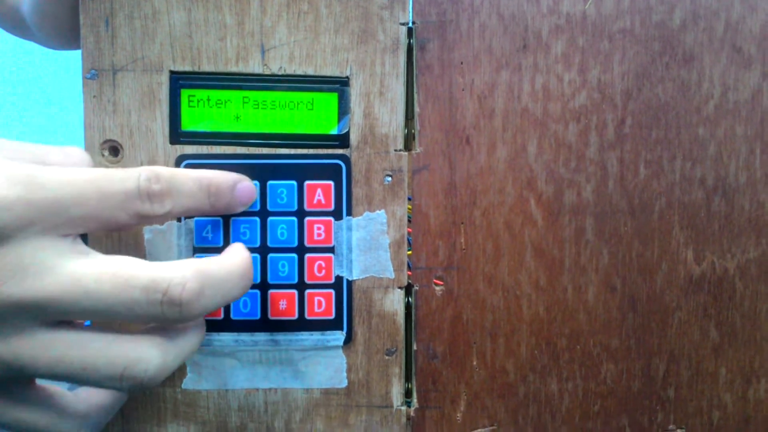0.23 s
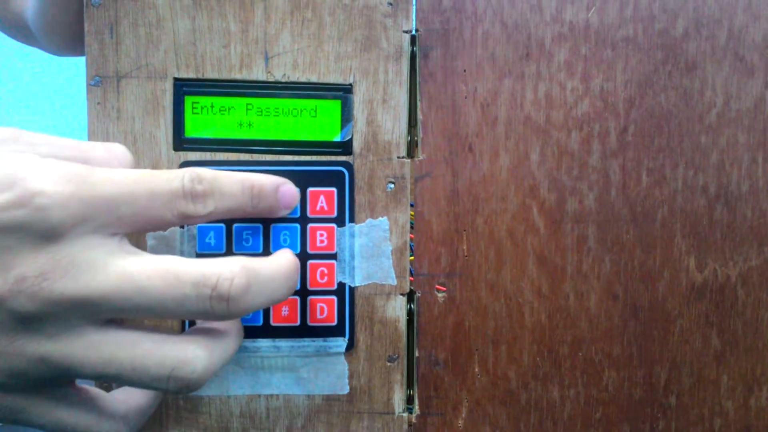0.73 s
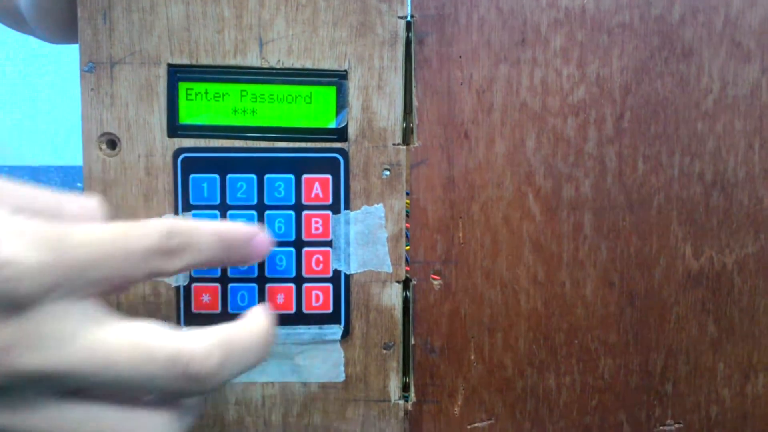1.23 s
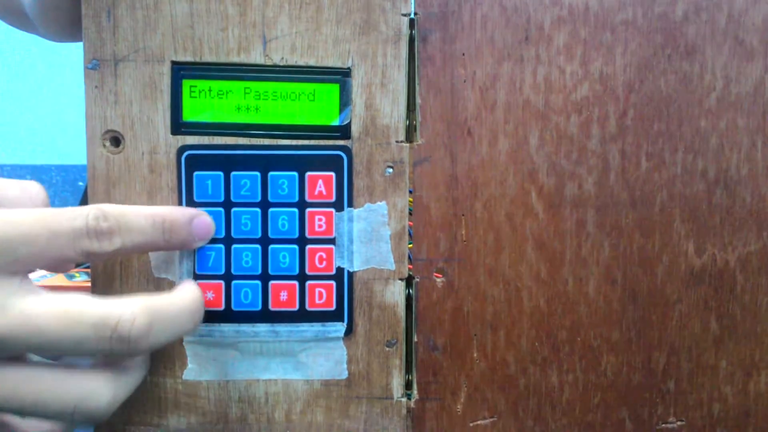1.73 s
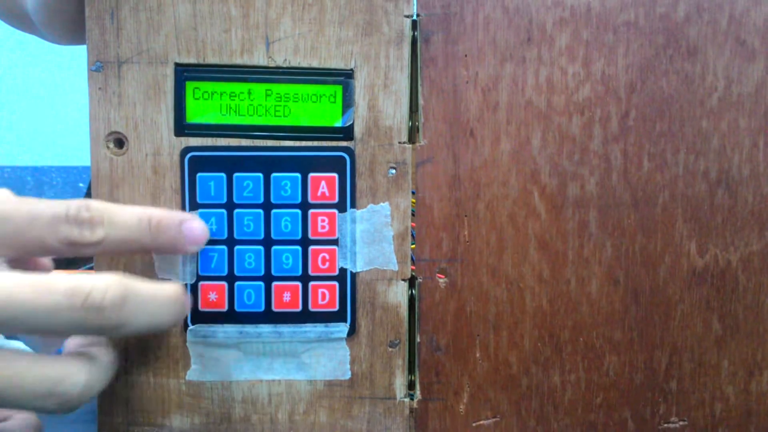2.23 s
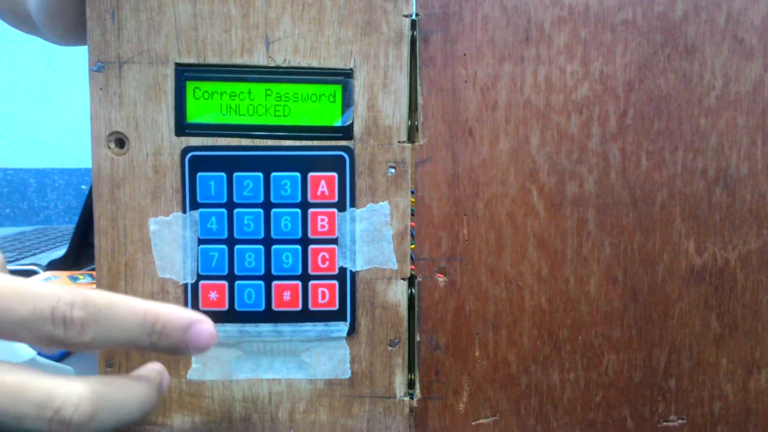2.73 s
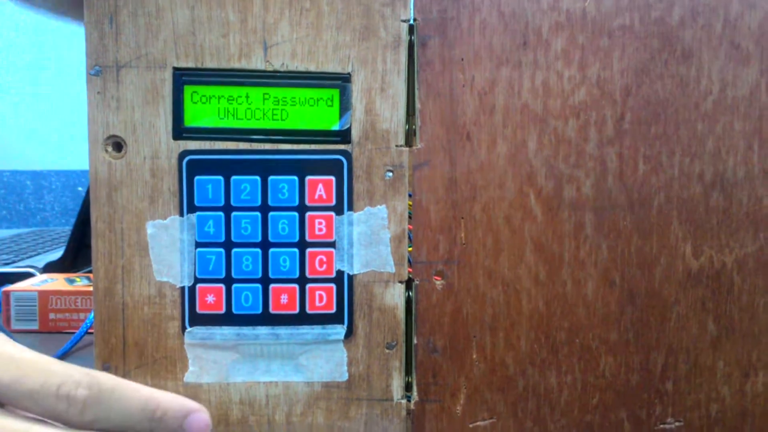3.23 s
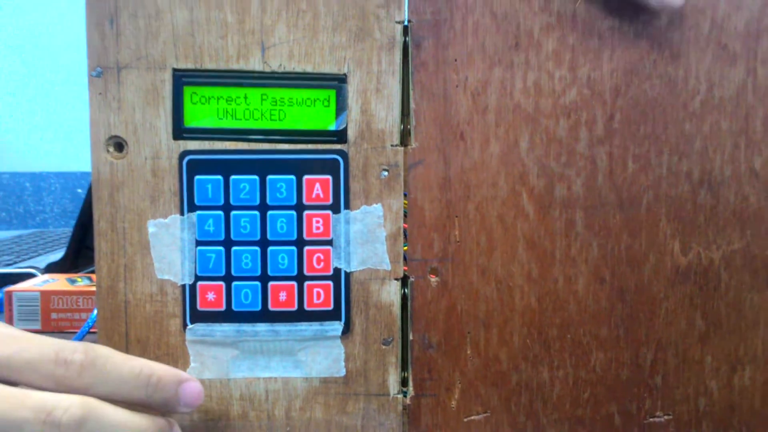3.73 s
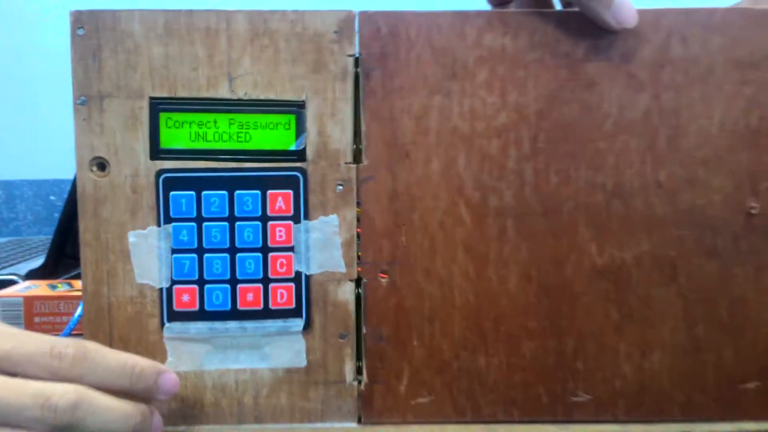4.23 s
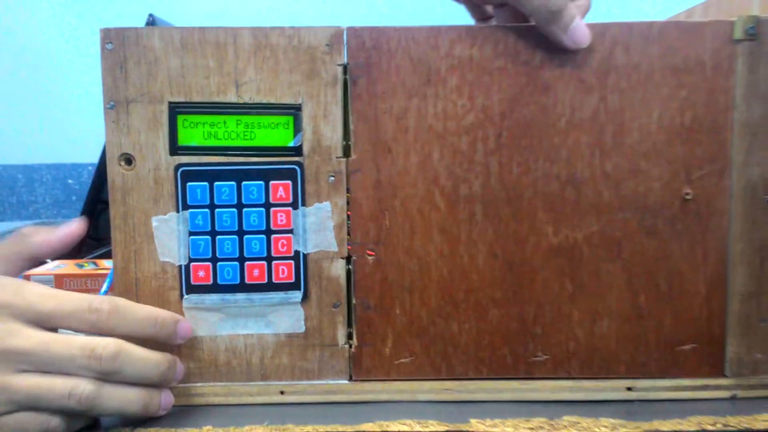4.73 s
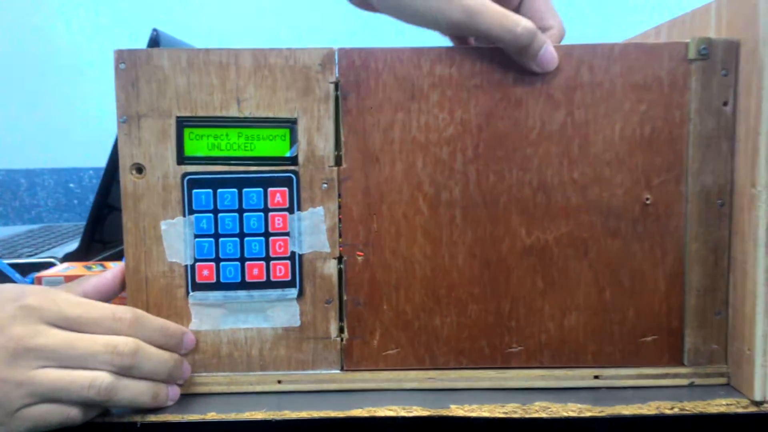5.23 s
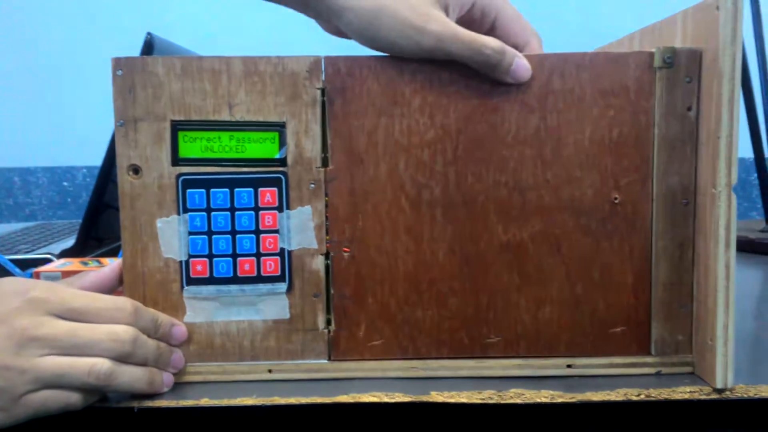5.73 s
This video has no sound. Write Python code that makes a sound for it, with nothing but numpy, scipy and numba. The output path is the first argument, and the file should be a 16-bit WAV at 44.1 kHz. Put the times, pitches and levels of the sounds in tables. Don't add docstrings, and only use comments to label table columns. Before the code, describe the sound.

Fingers press a plastic keypad with tiny dry clicks and dull panel knocks, hands hissing faintly across wood. Low bumps from handling come and go beneath steady room air and a faint machine hum. Near the end a short metal drag leads to a violent clipped clack with rapid bounces and boxy thud, ringing through a small reflective room, heard close on a phone.

```python
import sys
import numpy as np
from scipy import signal
from scipy.fft import rfft, irfft
from scipy.io import wavfile
from scipy.ndimage import uniform_filter1d
from numba import njit

SR = 44100
rng = np.random.default_rng(int(sys.argv[2]) if len(sys.argv) > 2 else 0)


def elevation(decibels):
    levels = np.asarray(decibels, float)
    return 10 ** (levels / 20)


def to_wav(sig):
    pcm = np.clip(np.atleast_2d(sig), -1, 1) * 32767
    pcm = np.round(pcm).astype(np.int16)
    wavfile.write(sys.argv[1], SR, pcm.T)


N = 264600
TIME = np.arange(N) / SR

# pitch in Hz, level in dB per Hz.
AIR_COLOUR = [(15, -38), (25, -8), (114, -22), (229, -10), (309, -21.5), (344, -13), (489, -18.5),
              (1130, -20), (1230, -20.5), (2050, -23), (3620, -23), (4870, -28.5), (6740, -30), (8360, -43),
              (16000, -38)]
AIR_DB = -50.5
# pitch in Hz, level in dB.
MACHINE_HUMS = [(59.2, -59), (344.5, -70), (532.9, -70.5), (1200, -67.5)]

# middle in seconds, length in seconds, level in dB.
THRUMS = [(0.216, 0.56, -48), (1.4, 0.27, -59), (1.78, .18, -52), (1.992, 0.11, -48.5), (2.358, 0.095, -54),
          (2.565, 0.24, -51), (2.886, 0.082, -48.5), (3.52, 0.087, -53.5), (4.28, 0.27, -59.5),
          (5.03, 0.11, -50.5), (5.327, .1, -57)]
# middle in seconds, length in seconds, level in dB.
TABLE_JOLTS = [(.18, 0.51, -55.5), (.56, 0.27, -62), (2.33, 0.13, -52), (2.62, .12, -53), (4.28, 0.19, -46),
               (4.56, 0.17, -45), (4.8, 0.34, -57.5), (5.14, .14, -54), (5.42, 0.23, -49)]
# middle in seconds, length in seconds, level in dB.
BOX_JOLTS = [(.1, 0.14, -60.5), (.5, 0.18, -55.5), (1.38, .26, -60), (1.78, 0.41, -65),
             (2.53, 0.082, -55.5), (3.9, 0.32, -56.5), (4.05, 0.063, -51.5), (4.3, 0.48, -58),
             (4.82, 0.21, -59), (5.13, 0.31, -55)]
RESTING_DB = (-60.5, -59, -56)

# pitch in Hz, level in dB per Hz.
ECHO_COLOUR = [(100, -26.5), (250, -22.5), (700, -29.5), (1850, -27), (2200, -20), (3000, -12),
               (3750, -4.5), (4600, -9), (5300, -11), (6900, -5), (7500, -10.5), (8000, -23),
               (10000, -25.5), (11500, -32.5), (16000, -38)]
# pitch in Hz, time to fade by 60 dB in seconds.
ECHO_T60 = [(100, 0.51), (500, 0.6), (1400, 0.51), (3000, 0.59), (6000, 0.57), (9000, 0.43), (11500, 0.35),
            (15000, 0.34)]
# pitch in Hz, width in Hz, level in dB.
LATCH_PLATE = [(720, 89, 8), (1096, 94, 9), (2460, 150, 4), (3790, 300, 1.5), (4470, 120, 7),
               (5110, 120, 6), (3290, 110, -3), (7390, 70, 3), (6900, 490, -3), (9550, 300, 4.5),
               (10250, 300, 6), (12650, 400, 6), (14900, 300, 3)]

# time in seconds, pressure in dB.
PALM_PRESSURE = [(0., 4.5), (.2, -0.5), (.62, 3), (.9, -2), (1.3, -0.5), (2.05, -3), (2.66, 0.5), (3.1, -2),
                 (3.5, 1.5), (4., 0), (4.56, 0), (5.3, 3.5), (5.4, 3.5)]
COARSE_DB, FINE_DB = -57, -68
FINE_SLOPE = 0.62
GRAIN_DB = 1.6
# start in seconds, rise in seconds, level in dB, fade by 60 dB in seconds.
SLEEVE_SWIPES = [
    (3.34, .08, -58, 2.2),
    (3.505, .008, -54, .6),
]
# start in seconds, length in seconds, level in dB, pitch in Hz.
SLIPS = [(.028, 0.046, -44, 3810), (.048, .04, -51, 7300), (.036, 0.035, -53, 6400),
         (.46, 0.027, -52, 4200), (.618, .045, -55, 7600), (.64, .014, -52.5, 3600),
         (1.178, 0.029, -53, 7400), (1.18, .022, -50, 4700), (1.447, .015, -61, 7700),
         (1.54, .035, -65, 7600), (1.535, .035, -58, 4570), (1.652, 0.035, -57.5, 7500),
         (1.652, .035, -52.5, 4020), (1.655, .035, -59, 5600), (1.178, 0.026, -61, 2300),
         (2.045, 0.038, -51.5, 3720), (3.338, .08, -49, 3780), (3.415, .032, -47, 7000),
         (3.365, .05, -57, 7300), (3.42, 0.014, -59, 9350), (3.36, .16, -57, 4000), (.05, .06, -56, 3800),
         (.6, .09, -59.5, 2300), (.462, .03, -58, 2200), (5.957, 0.014, -60, 11700),
         (5.981, .019, -44, 7100), (5.979, 0.022, -45, 11800), (5.982, 0.016, -44, 3880)]
# start in seconds, length in seconds, level in dB, pitch in Hz.
SLIDES = [(.6, .3, -65, 920), (2.1, .33, -72, 7160), (2.95, 0.17, -64, 2440), (3.33, .062, -53.5, 418),
          (3.72, .3, -63, 7000), (4.7, 0.64, -57.5, 3020), (4.85, 0.41, -65, 950)]
# start in seconds, length in seconds, level in dB, pitch in Hz.
SQUEAKS = [(.628, .022, -54, 8000), (1.98, .035, -54, 3550), (2.17, .25, -68, 7300), (2.17, .2, -68, 5300),
           (5.98, .02, -40, 7100), (4.66, .2, -62, 2550), (4.88, .3, -64, 930)]
SLIP_WIDTH, SLIDE_WIDTH, SQUEAK_WIDTH = .24, 0.16, .04
# time in seconds, peak in dB, pitch in Hz, ring of the microphone port in dB.
TICKS = [(.0453, -40.5, 4270, 10.5), (.4612, -33, 4770, -4), (.4652, -40, 3470, -5), (.4680, -43, 2980, -6),
         (.5942, -44, 8800, 4), (.5945, -48, 5200, -11), (.6198, -41, 3600, -11), (.6242, -33, 3600, -16),
         (.6570, -44, 4630, -6), (1.1790, -29.5, 6900, -5.5), (1.1792, -36, 4730, -10),
         (1.2776, -45, 7500, -4), (1.6548, -42, 8000, 0), (2.0515, -45.5, 7500, 6.5),
         (2.1662, -38, 6700, -21), (2.2146, -48, 7000, -8), (2.3300, -45, 9300, -13),
         (3.3418, -46, 3600, -2), (3.4062, -33, 7140, -12), (3.4228, -39, 9700, -10),
         (3.4300, -21.5, 6850, -30), (4.1090, -41, 9000, -24), (4.3228, -48, 9000, -6),
         (4.3600, -52, 9000, -12), (5.0220, -44, 6800, -10), (5.2870, -38.5, 6540, -1),
         (5.9797, -22, 7060, -13), (5.9850, -21, 6860, -10), (5.9930, -19, 6700, -8)]
SNAP_T60_S, SNAP_FALL = 0.0053, 2
# time in seconds, level in dB, brightness in dB per octave.
KNOCKS = [(.461, -37, 2.5), (0.595, -42, -1), (.655, -41, -1), (1.179, -42, -3.5), (2.052, -46, -6),
          (2.64, -46.5, -12), (3.343, -47.5, -6), (5.399, -44.5, 6), (5.990, -38, -13)]
# pitch in Hz, level in dB, fade by 60 dB in seconds.
PANEL = [(231, -2, 0.027), (354, 4.5, 0.2), (408, 1.5, 0.054), (783, 7.5, 0.09), (911, -0.5, 0.22),
         (1087, 1, .06), (1490, -0.5, 0.068), (1950, -3, 0.066)]

# time in seconds, level in dB.
DRAG = [(5.399, -58.5), (5.410, -46), (5.440, -43.5), (5.450, -48.5), (5.458, -38.5), (5.490, -40),
        (5.512, -37), (5.516, -34)]
# pitch in Hz, width in Hz, level in dB.
BOLT_SLEEVE = [(1000, 200, -9.5), (2300, 680, -6), (3600, 370, -0.5), (4250, 200, -9), (5760, 200, -7.5),
               (6300, 290, -10), (7160, 190, -0.5)]
# pitch in Hz, level in dB, fade by 60 dB in seconds.
NOSE = [(2120, -4, 0.016), (2690, -8, 0.015), (3760, -2, 0.082), (4300, -5, 0.053), (5430, -4, 0.016),
        (7100, -10.5, 0.02), (9690, -18, 0.011)]
TOUCH_S, CAUGHT_S, SLAM_S = 5.5187, 5.5303, 5.5313
TOUCH_DB = 1.5
# delay in seconds, level in dB, fade by 60 dB in seconds.
BLOWS = [(0., 8, 0.026), (.0035, 12.5, 0.027), (.0070, 7, 0.01), (0.0104, 3, 0.016), (0.0154, 7, .009),
         (.0186, 3.5, .009)]
# pitch in Hz, level in dB, fade by 60 dB in seconds.
BOLT_RING = [(2380, -6, 0.44), (3440, -18, 5.0), (3560, -11, 0.19), (4070, -36, 5.0), (3730, -11, 0.57),
             (4566, 2, 0.14), (4740, -5, 2.1), (5176, -6.5, 0.32), (5900, -2.5, 0.22), (5660, -2.5, 0.24),
             (6300, -8.5, 0.16), (6400, -10.5, 0.2), (6750, 13, 0.33), (7060, -7, 0.31), (7359, -13, 0.14),
             (8060, -38, 0.22), (9300, -23.5, 0.22), (10400, -25, 0.19), (12800, -38.5, 0.41),
             (15800, -25.5, 0.16)]
# pitch in Hz, level in dB, fade by 60 dB in seconds.
BOX_THUD = [(185, -12.5, 0.055), (195, 9, 0.04), (270, 4, .03), (513, -8.5, 0.035),
            (699, 15.0, 0.033), (937, 11.5, .05), (1446, 17, 0.01), (1800, 18, .012)]

TOP_HZ, CLIP = 15750, .82


def level(x, db):
    return x * elevation(db) / np.sqrt(np.mean(x ** 2))


def band(x, hz, width_hz):
    return signal.lfilter(*signal.iirpeak(hz, max(hz / width_hz, .3), fs=SR), x)


def along(table, hz):
    f, value = np.transpose(table)
    return np.interp(np.log(hz), np.log(f), value)


def slices(table, size):
    f = np.fft.rfftfreq(size, 1 / SR) + 1e-3
    shaped = rfft(rng.standard_normal(size)) * elevation(along(table, f))
    parts = []
    for centre in 25 * 2 ** np.arange(0, 10, .5):
        share = np.clip(1 - 2 * abs(np.log2(f / centre)), 0, 1)
        parts.append((centre, irfft(shaped * share, size)))
    return parts


def walk(rate):
    k = int(SR / rate)
    held = np.repeat(rng.standard_normal(N // k + 1), k)
    return uniform_filter1d(uniform_filter1d(held, k), k)[:N]


def ring(modes, tilt_db=0., longest=1.):
    t = TIME[:SR // 2]
    out = 0
    for hz, db, t60 in modes:
        fade = elevation(-60 * t / min(t60, longest))
        out = out + elevation(db + tilt_db * np.log2(hz / 600)) * np.sin(2 * np.pi * hz * t) * fade
    return out


def add(out, s, sound):
    i = int(s * SR)
    out[i:i + len(sound)] += sound[:N - i]


def grit(spread_db):
    return level(rng.standard_normal(N) * elevation(spread_db * rng.exponential(size=N)), 0)


def port(x):
    return signal.sosfilt(signal.butter(8, 7900, fs=SR, output="sos"), x) + elevation(-24) * x


def air():
    bed = 0
    for hz, part in slices(AIR_COLOUR, N):
        if hz > 250:
            bed = bed + elevation(2.3 * min(1, 3000 / hz) * walk(5.92)) * part
    hums = 0
    for hz, db in MACHINE_HUMS[1:]:
        waver = elevation(db + 1.5 + 3 * walk(6.02))
        hums = hums + waver * np.sin(2 * np.pi * hz * TIME + 1.2 * walk(5))
    running = np.clip((4.8 - TIME) / 1.3, .3, 1)
    return level(bed, AIR_DB - 5.5) + running * hums


def rumble():
    shake = rng.standard_normal((3, N))
    deep = band(band(shake[0], 57.7, 11.6), 59, 30) + elevation(-5.5) * band(shake[0], 32, 18)
    table = band(band(shake[1], 114.7, 36), 112.7, 62)
    box = elevation(-9.0) * band(shake[2], 173.5, 37.5) + band(shake[2], 209.0, 37)
    out = 0
    for body, rest_db, jolts in zip((deep, table, box), RESTING_DB, (THRUMS, TABLE_JOLTS, BOX_JOLTS)):
        swell = sum(elevation(db) * np.exp(-(2.76 * (TIME - s) / length) ** 2) for s, length, db in jolts)
        out = out + level(body, 0) * (elevation(rest_db) + swell)
    return out


def room(x, wet_db):
    t = TIME[:SR]
    tail = sum(part * elevation(-60 * t / along(ECHO_T60, hz)) for hz, part in slices(ECHO_COLOUR, SR))
    lumps = elevation(2.4 * walk(400)[:SR] * np.exp(-t / 0.17))
    tail = tail * lumps * np.clip(t / 0.0033, 0, 1) / np.sqrt(np.sum(tail ** 2))
    return elevation(wet_db) * signal.fftconvolve(x, tail)[:N]


def palms_and_sleeve(cloth):
    pressure_db = np.interp(TIME, *np.transpose(PALM_PRESSURE))
    coarse = band(band(grit(GRAIN_DB), 3650, 1100), 3650, 1100)
    fine = port(band(band(cloth, 6770, 1300), 6720, 1300))
    fine += elevation(-14.5) * band(band(cloth, 9500, 1000), 9500, 1000)
    swipe = 0
    for s, rise, db, t60 in SLEEVE_SWIPES:
        fade = elevation(db - 60 * np.maximum(TIME - s, 0) / t60)
        swipe = swipe + fade * np.clip((TIME - s) / rise, 0, 1)
    fine_gain = elevation(FINE_DB + FINE_SLOPE * pressure_db) + swipe
    return level(coarse, COARSE_DB) * elevation(pressure_db) + level(fine, 0) * fine_gain


def scrapes(cloth):
    out = np.zeros(N)
    for rows, width in ((SLIPS, SLIP_WIDTH), (SLIDES, SLIDE_WIDTH), (SQUEAKS, SQUEAK_WIDTH)):
        for s, length, db, hz in rows:
            size = int(length * SR)
            grains = cloth[int(s * SR / 2):][:size]
            scrape = band(band(grains, hz, width * hz), hz, width * hz)
            swell = np.hanning(size) ** .5 * elevation(-4 * np.linspace(-1, 1, size))
            add(out, s, level(scrape, db) * swell)
    return out


def nail_ticks():
    out = np.zeros(N)
    for s, db, hz, port_db in TICKS:
        t60 = SNAP_T60_S * (7000 / hz) ** SNAP_FALL
        snap = ring([(hz, 0, t60), (1.39 * hz, -13, t60 / 2),
                     (min(2 * hz, 15000), -20, t60 / 3), (3650, port_db, .015)])
        add(out, s, elevation(db) * snap * np.clip(TIME[:len(snap)] / 0.00026, 0, 1))
    return out


def key_knocks():
    out = np.zeros(N)
    for s, db, tilt_db in KNOCKS:
        add(out, s, elevation(db - 13.5) * ring(PANEL, tilt_db))
    return out


def hands():
    cloth = grit(GRAIN_DB)
    return palms_and_sleeve(cloth) + scrapes(cloth) + nail_ticks() + key_knocks()


def bolt_drag(rub):
    s, db = np.transpose(DRAG)
    drag = port(sum(elevation(d - 10 * np.log10(w)) * band(band(rub, hz, 2 * w), hz, w)
                    for hz, w, d in BOLT_SLEEVE))
    loudness = elevation(np.interp(TIME, s, db, left=-120, right=-120))
    return level(drag, 0) * uniform_filter1d(loudness, size=130)


def bolt_touch(rub):
    out = np.zeros(N)
    t = TIME[:int((CAUGHT_S - TOUCH_S) * SR)]
    grip = np.clip(t / 0.0028, 0, 1) * np.clip((t[-1] - t) / 0.0018, 0, 1)
    nose = ring(NOSE)[:len(t)] + elevation(-15) * port(rub[:len(t)])
    add(out, TOUCH_S, elevation(TOUCH_DB - 3) * grip * nose)
    return out


def bolt_slam():
    blows, t = np.zeros(N), TIME[:SR // 10]
    cracks = rng.standard_normal((len(BLOWS), len(t)))
    for (delay, db, t60), crack in zip(BLOWS, cracks):
        add(blows, SLAM_S + delay, elevation(db - 60 * t / t60) * crack)
    out = elevation(14) * band(band(blows, 3290, 2000), 3990, 900)
    out += elevation(15.0) * band(band(blows, 6140, 1200), 6900, 1150)
    hard = np.exp(-np.clip(TIME - SLAM_S, 0, 1) / 0.023)
    out += hard * (elevation(-9.5) * blows + elevation(-6.0) * band(blows, 13000, 3400))
    add(out, SLAM_S, elevation(-34.5) * ring(BOLT_RING, longest=0.25))
    add(out, SLAM_S, elevation(-19) * ring(BOX_THUD))
    return out


def bolt():
    rub = grit(0.71)
    return bolt_drag(rub) + bolt_touch(rub) + bolt_slam()


def scene():
    near, blow = hands(), np.zeros(N)
    blow[int(SLAM_S * SR)] = elevation(32.0)
    blow = blow + sum(elevation(db) * band(blow, hz, width_hz) for hz, width_hz, db in LATCH_PLATE)
    echo = room(elevation(-13) * near + blow, 0)
    return (air() + rumble() + near + bolt() + echo)[None]


@njit
def follow(x, attack, release):
    e, y = 1e-4, np.empty(len(x))
    for i in range(len(x)):
        e += (abs(x[i]) - e) * (attack if abs(x[i]) > e else release)
        y[i] = e
    return y


def band_limit(x):
    return signal.sosfilt(signal.butter(12, 15830, fs=SR, output="sos"), x)


def record(dry):
    seen = follow(dry[0], 1 / (0.024 * SR), 1 / (1.5 * SR))
    gain = np.minimum(elevation(-17.5) / seen, 1) ** 0.71
    clipped = np.clip(dry * gain, -CLIP, CLIP)
    low_pass = signal.ellip(8, .2, 60, TOP_HZ, fs=SR, output="sos")
    mix = signal.sosfilt(low_pass, clipped)
    return band_limit(mix)


dry = scene()
out = record(dry)
to_wav(out)
```